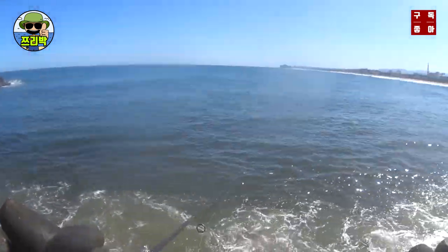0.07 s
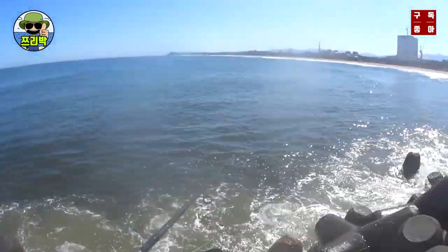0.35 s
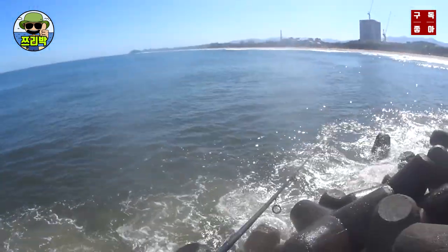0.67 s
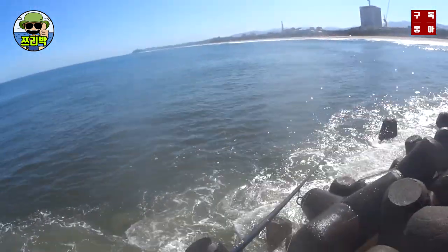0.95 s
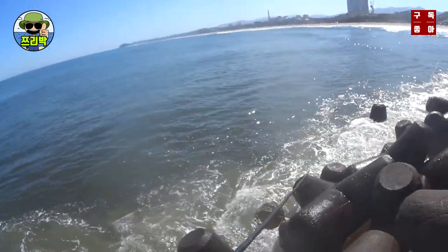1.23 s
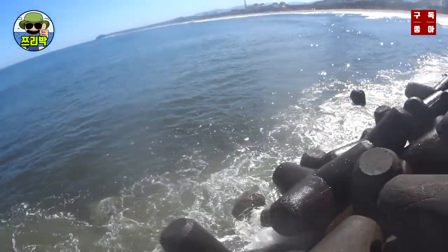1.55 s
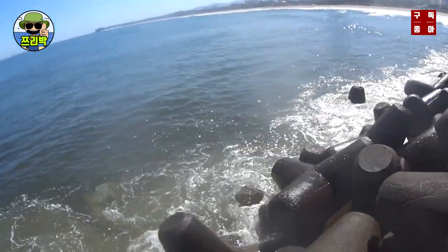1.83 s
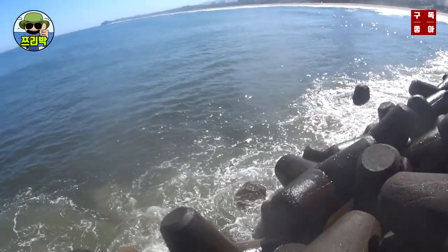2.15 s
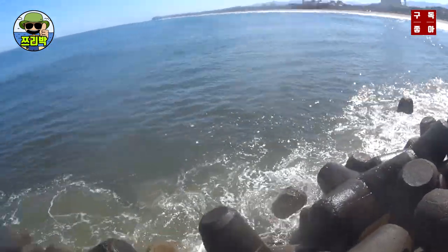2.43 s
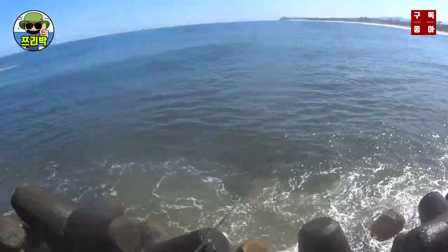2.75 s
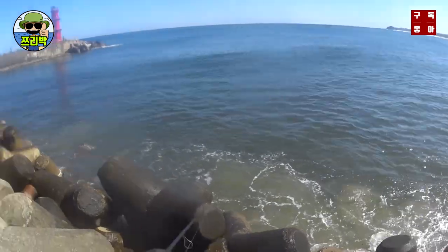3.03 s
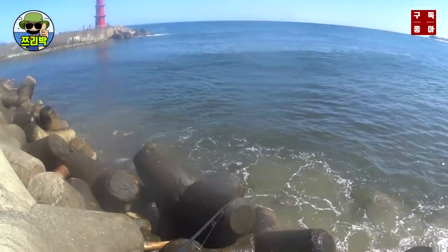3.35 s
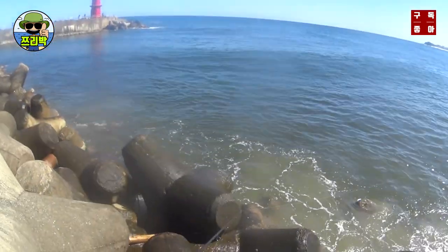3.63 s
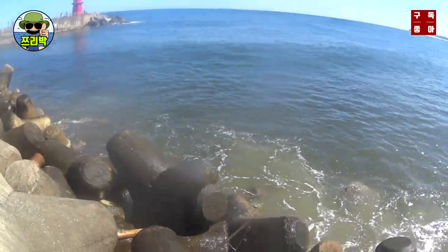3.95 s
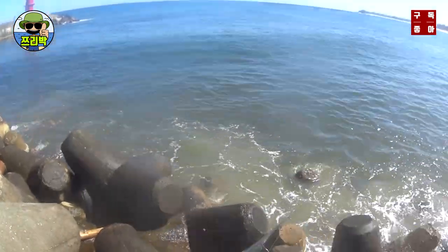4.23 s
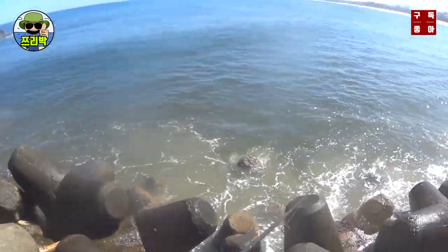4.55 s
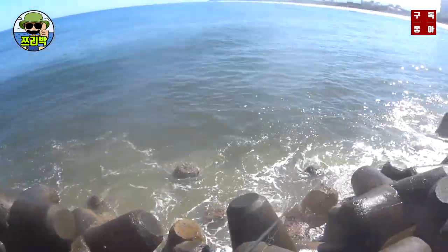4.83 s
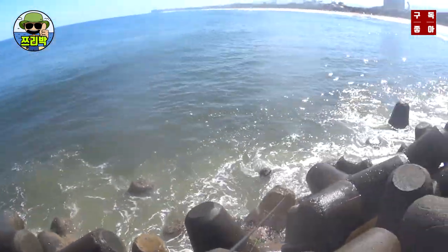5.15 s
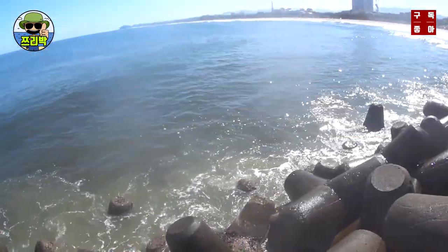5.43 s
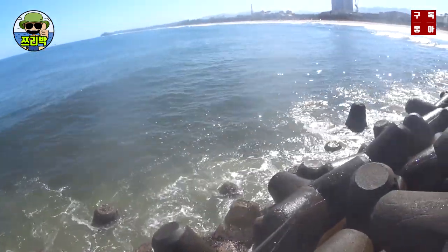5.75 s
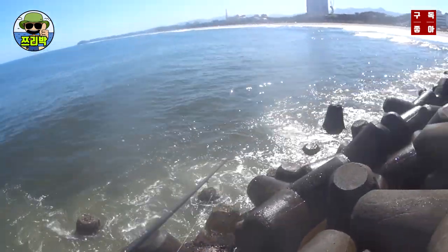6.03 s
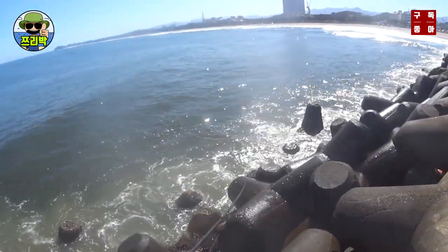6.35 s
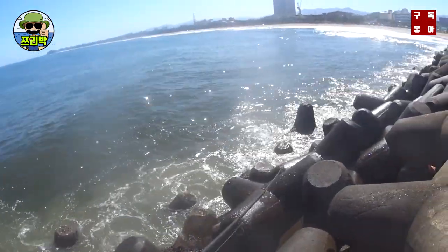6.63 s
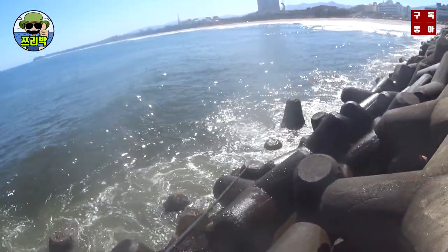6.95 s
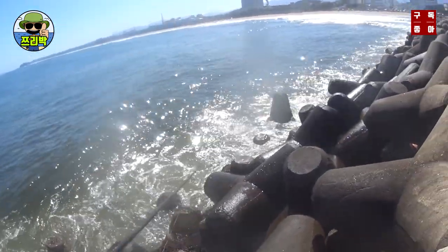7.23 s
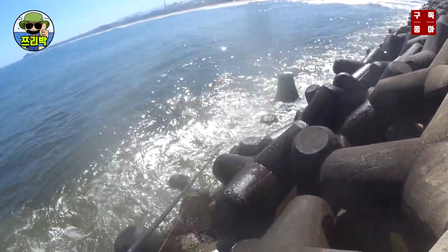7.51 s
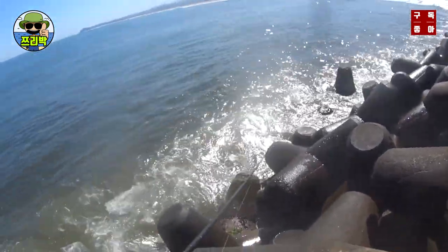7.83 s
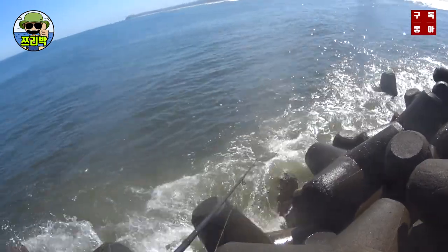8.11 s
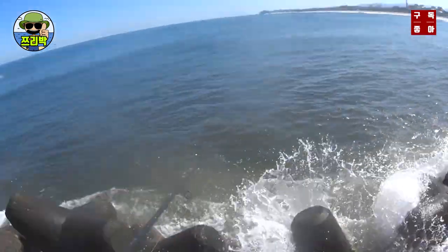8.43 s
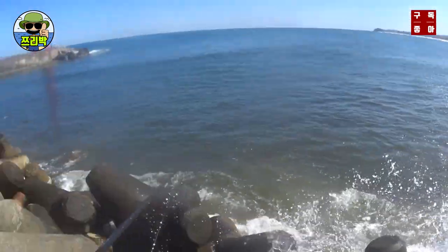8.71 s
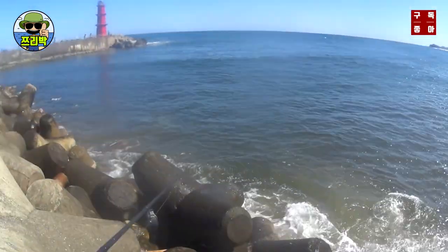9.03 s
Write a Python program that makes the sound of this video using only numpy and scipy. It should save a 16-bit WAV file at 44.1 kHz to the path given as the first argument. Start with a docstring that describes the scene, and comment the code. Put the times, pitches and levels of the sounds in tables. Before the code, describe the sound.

Sea water washes over the concrete blocks of a breakwater, heard from just above. A wave drains away with fizzing foam and a few hollow gulps in the gaps. In the quieter stretch, small splashes slap the concrete and drops tick nearby. Near the end a bigger wave builds and breaks with heavy thumps, a low roar and a bright hiss of falling spray.

```python
"""Swell on a breakwater

Sea washes over concrete blocks, heard from just above. One wave drains away, foam fizzes and
water gulps in the gaps, then a bigger wave breaks and throws spray.
Big bubble clouds make the low roar, small bubbles the wash, falling drops the hiss."""
import sys
import numpy as np
from scipy import signal
from scipy.fft import rfft, irfft
from scipy.io import wavfile

SR = 44100
rng = np.random.default_rng(int(sys.argv[2]) if len(sys.argv) > 2 else 0)


def unload_wav(signal):
    """Save mono or channel-first audio to the path in sys.argv[1] as 16-bit WAV at rate SR, clipped to [-1, 1]."""
    wavfile.write(
        sys.argv[1],
        SR,
        np.round(np.clip(np.atleast_2d(signal).T, -1, 1) * 32767).astype(np.int16),
    )


N = 404397
TIME_S = np.arange(N) / SR
FREQ_HZ = np.maximum(np.arange(N // 2 + 1) * SR / N, 1)

# sea working against the blocks: (time [s], whitewater level [dB])
SURGE_CURVE = [(0, -31.5), (.5, -35), (1.2, -33.5), (1.55, -36), (1.9, -37), (2.25, -39.5), (3.3, -43),
               (3.85, -42), (4.25, -39), (4.6, -41), (7.05, -43), (7.6, -36.5), (7.8, -30), (8.0, -29.5),
               (8.25, -24), (8.7, -24.5), (9.05, -25.5), (9.17, -28)]
# toppling crests: (start [s], lift of wash and spray [dB], rise [s])
BREAKER_LIFTS = [(1.63, 4, 0.079), (7.67, 3, 0.029), (8.035, 3.5, 0.022), (8.19, 1.8, 0.028)]
# surf colour: (frequency [Hz], gain [dB])
SURF_SPECTRUM = [(21, -73), (35, -45.5), (165, -19), (264, -9.5), (495, -1), (726, -5.5), (1110, -2.5),
                 (1420, -4.5), (2280, -4), (3120, -5.5), (5120, -2), (5860, -6.5), (7500, -18.5),
                 (9750, -19), (16500, -120)]
# fine mist colour: (frequency [Hz], gain [dB])
MIST_SPECTRUM = [(2940, -24), (5000, -27.5), (5760, -5), (9290, -17.5), (12200, -16), (14400, -23)]
# spray landing close by: (peak time [s], level [dB], Gaussian sigma [s], centre [Hz], width [Hz])
SPRAY_SHOWERS = [(.1, -63, .25, 12300, 2000), (1.03, -42.5, 0.16, 6800, 4500),
                 (1.034, -30.5, 0.034, 5560, 1500), (1.75, -54, 0.13, 12500, 2500),
                 (4.353, -49, 0.05, 11800, 2200), (4.34, -37.5, .035, 5160, 1600),
                 (4.45, -39, 0.05, 4930, 2000), (5.052, -52, .2, 5900, 4000),
                 (8.43, -26.5, 0.043, 5200, 2400), (8.71, -42, 0.47, 12300, 2037),
                 (8.957, -25.5, 0.14, 4960, 2600)]
# sheets of water hitting concrete: (start [s], peak [dB], twice the rise [s])
WATER_SLAPS = [(.147, -19, .0036), (3.061, -26, .006), (3.504, -28, .007), (3.586, -23.5, 0.011),
               (3.74, -25, .009), (3.835, -26, .003), (4.31, -26, 0.055), (4.665, -28, .003),
               (5.186, -23, 0.0077), (5.581, -26, 0.024), (6.984, -28, .006), (7.241, -27, .003),
               (7.67, -21, .015), (7.73, -21.5, 0.021)]
# air pockets closing between blocks: (start [s], relative peak [dB], pitch [Hz], twice the rise [s])
AIR_POCKETS = [(0.764, -33, 377, 0.032), (1.277, -28, 455, 0.02), (1.464, -30, 477, 0.026),
               (2.173, -34.5, 327, 0.022), (2.606, -35, 380, 0.025), (3.283, -34.5, 906, 0.026),
               (4.25, -28, 1185, 0.02), (4.383, -27, 538, 0.02), (5.047, -30.5, 530, 0.017)]
# heavy water striking the blocks: (start [s], level [dB], rise [s], centre [Hz], width [Hz])
WATER_THUMPS = [(.77, -39, 0.019, 403, 400), (1.25, -42, .04, 350, 400), (1.68, -37, 0.023, 477, 500),
                (7.738, -24, 0.015, 1050, 1280), (7.742, -30.5, .035, 434, 450),
                (8.035, -31.5, 0.027, 400, 400), (8.19, -46, 0.064, 177, 171), (8.22, -28, 0.12, 450, 450),
                (8.308, -22.5, 0.017, 990, 1300), (8.58, -30, 0.084, 497, 500),
                (9.11, -37.5, .023, 212, 199)]
# single drops landing close by: (start [s], peak [dB], pitch [Hz])
NEAR_DRIPS = [(3.132, -35, 8700), (4.095, -36, 12000), (4.128, -35, 12300), (4.161, -35, 12000),
              (4.571, -42, 10300), (4.647, -39, 12000), (4.670, -32, 8100), (7.719, -29, 8500)]
# incoming crest spilling: (time [s], level [dB])
CREST_CURVE = [(0, -93), (5.3, -55), (6.0, -53), (7.0, -50), (7.4, -45), (7.75, -43), (8.0, -38),
               (9.17, -69)]
# two microphone ports: (frequency [Hz], left lead [rad], left minus right [dB], stray share [dB])
MIC_PORTS = [(60, .05, -2, -16), (180, 0.34, -1.3, -24), (450, 0.4, -1, -26), (850, 0.53, 0.1, -23),
             (1600, 0.42, 1.2, -18), (3000, 0.12, 1.5, -16.5), (5500, -0.096, 1, -22.5),
             (9500, -.07, 0, -18.5), (11000, -0.42, 0.5, -9), (11800, .4, -2, -5), (13500, 0, 0.5, -16)]

CALM_DB = -40  # whitewater between waves
ROAR_DB, ROAR_DB_PER_DB = -45.5, 0.97  # in the calm; slope against surge
SPRAY_DB, SPRAY_DB_PER_DB = -40.5, 1.123  # in the calm; slope against surge
MIST_DB, MIST_DB_PER_DB = -14.5, 0.042  # relative to spray; slope against thrown spray
HEAVE_DB, HEAVE_HZ = 0.55, 4.2  # bubble clouds surface unevenly
SPRAY_FLIGHT_S = 0.059
CUTOFF_HZ = 14350


def from_db(db):
    """Decibels to gain."""
    return 10 ** (np.asarray(db) / 20)


def unit_rms(x):
    """Scale to unit power."""
    return x / np.sqrt(np.mean(x ** 2) + 1e-20)


def over_time(curve, delay_s=0):
    """A delayed curve at every sample."""
    times_s, values = np.transpose(curve)
    return np.interp(TIME_S - delay_s, times_s, values)


def over_frequency(rows):
    """Each column of a spectrum at every bin."""
    hz, *columns = np.transpose(rows)
    return [np.interp(np.log(FREQ_HZ), np.log(hz), column) for column in columns]


def band(x, spectrum, low_hz, high_hz):
    """Colour and band-limit with soft edges; unit RMS."""
    colour = from_db(over_frequency(spectrum)[0])
    edge_loss = (1 + (low_hz / FREQ_HZ) ** 12) * (1 + (FREQ_HZ / high_hz) ** 12)
    return unit_rms(irfft(rfft(x) * colour / np.sqrt(edge_loss), N))


def drift(rate_hz):
    """Smooth random wander; unit RMS."""
    return unit_rms(irfft(rfft(rng.standard_normal(N)) / (1 + (FREQ_HZ / rate_hz) ** 2), N))


def resonate(x, hz, width_hz):
    """Two-pole resonance, unity peak gain."""
    radius = np.exp(-np.pi * width_hz / SR)
    feedback = [1, -2 * radius * np.cos(2 * np.pi * hz / SR), radius ** 2]
    return signal.lfilter(np.array([1, 0, -1]) * (1 - radius ** 2) / 2, feedback, x + 1e-18)


def resonate_twice(x, hz, width_hz):
    """Two equal resonances in series; unit RMS."""
    return unit_rms(resonate(resonate(x, hz, width_hz), hz, width_hz))


def burst(start_s, rise_s):
    """Envelope: rises to 1, then decays."""
    age = np.maximum(TIME_S - start_s, 0) / rise_s
    return age * np.exp(1 - age)


def impacts(per_s, spread_db):
    """Random clicks: many small, a few large."""
    sizes = from_db(spread_db * np.minimum(rng.exponential(1, N), 6))
    return sizes * rng.choice([-1, 1], N) * (rng.random(N) < per_s / SR)


def bubbles(per_s, spread_db, low_hz, high_hz, q, clump_db, sizes=16):
    """Bubbles ring briefly at birth; each size comes in its own clumps."""
    births, size = impacts(per_s, spread_db), rng.integers(0, sizes, N)
    out = 0
    for k, hz in enumerate(np.geomspace(low_hz, high_hz, sizes)):
        ringing = resonate(births * (size == k), hz, hz / q)
        out += ringing * from_db(clump_db * drift(rate_hz=6.2))
    return unit_rms(out)


def surge_db(delay_s=0):
    """Sea strength relative to the calm."""
    return over_time(SURGE_CURVE, delay_s) - CALM_DB


def breaker_db():
    """Brief lift from each toppling crest."""
    return sum(db * burst(start_s, rise_s) for start_s, db, rise_s in BREAKER_LIFTS)


def roar():
    """Air clouds throb under the foam, over the blur of distant surf."""
    clouds = bubbles(per_s=900, spread_db=1.5, low_hz=130, high_hz=826, q=7.9, clump_db=1.5)
    water = from_db(-2.5) * clouds + from_db(12.5) * rng.standard_normal(N)
    level_db = ROAR_DB + ROAR_DB_PER_DB * surge_db() + HEAVE_DB * drift(HEAVE_HZ)
    return from_db(level_db) * band(water, SURF_SPECTRUM, 25, 766)


def wash(churn_db):
    """Whitewater: thousands of small bubbles a second, swelling with the churn."""
    near = bubbles(per_s=5000, spread_db=2, low_hz=590, high_hz=3895, q=7.5, clump_db=0.56)
    water = near + from_db(7) * rng.standard_normal(N)
    level_db = CALM_DB + surge_db() + breaker_db() + churn_db
    return from_db(level_db) * band(water, SURF_SPECTRUM, 660, 3260)


def spray(churn_db):
    """Drops patter on water and concrete; more thrown gives a denser, smoother hiss."""
    thrown_db = SPRAY_DB_PER_DB * surge_db(SPRAY_FLIGHT_S) + breaker_db()
    per_s = 5200 * from_db(0.7 * thrown_db)
    drops = unit_rms(impacts(per_s, spread_db=2) / np.sqrt(per_s))
    foam = drops + from_db(-0.5) * rng.standard_normal(N)
    foam *= from_db(churn_db + 0.68 * drift(rate_hz=30))
    pops = unit_rms(impacts(per_s / 4, spread_db=0.5) / np.sqrt(per_s))
    mist = from_db(MIST_DB + MIST_DB_PER_DB * thrown_db) * band(foam + pops, MIST_SPECTRUM, 6570, 17500)
    return from_db(SPRAY_DB + thrown_db) * (band(foam, SURF_SPECTRUM, 3430, 7080) + mist)


def rumble():
    """Faint, deep open sea; independent at each port."""
    ports = [resonate_twice(rng.standard_normal(N), hz=89, width_hz=70) for _ in range(2)]
    return from_db(-79.5) * np.array(ports)


def showers():
    """Fine spray lands in a soft, bright swish."""
    drops = impacts(per_s=12000, spread_db=4)
    out = 0
    for peak_s, db, sigma_s, hz, width_hz in SPRAY_SHOWERS:
        swell = np.exp(-0.5 * ((TIME_S - peak_s) / sigma_s) ** 2)
        out += from_db(db) * swell * resonate_twice(drops, hz, width_hz)
    return out


def slaps():
    """A sheet of water lands as a tight cluster of drop impacts."""
    envelope = sum(from_db(db) * burst(start_s, span_s / 2) for start_s, db, span_s in WATER_SLAPS)
    drops = resonate(impacts(per_s=9000, spread_db=2.5), hz=4600, width_hz=2600)
    patter = band(drops, SURF_SPECTRUM, 1250, 9000)
    return envelope * patter / np.percentile(np.abs(patter), 99.5)


def gulps():
    """Trapped air rings hollow and unsteady, rising in pitch as it nears the surface."""
    waver = 0.08 * drift(rate_hz=76)
    out = 0
    for start_s, db, hz, span_s in AIR_POCKETS:
        glide = 0.47 * np.clip(TIME_S - start_s, 0, 0.1)
        phase_rad = 2 * np.pi * np.cumsum(hz * (1 + waver + glide)) / SR
        out += from_db(db - 7) * burst(start_s, span_s / 2) * np.sin(phase_rad)
    return out


def thumps():
    """Heavy water hits concrete and drives a hollow rush of air through the gaps."""
    rush = impacts(per_s=6000, spread_db=1)
    return sum(from_db(db) * burst(start_s, rise_s) * resonate_twice(rush, hz, width_hz)
               for start_s, db, rise_s, hz, width_hz in WATER_THUMPS)


def drips(decay_s=0.00044):
    """A lone drop gives one tiny, bright tick."""
    out = 0
    for start_s, db, hz in NEAR_DRIPS:
        age_s = np.maximum(TIME_S - start_s, 0)
        out += from_db(db) * np.exp(-age_s / decay_s) * np.sin(2 * np.pi * hz * age_s)
    return out


def crest():
    """A spilling crest gargles in one range of bubble sizes."""
    spill = bubbles(per_s=2500, spread_db=0, low_hz=990, high_hz=1456, q=14, clump_db=4.5, sizes=6)
    return from_db(over_time(CREST_CURVE)) * unit_rms(resonate(spill, hz=1050, width_hz=900))


def block_scatter(t60_s):
    """Dense echoes off the jumbled blocks, as an all-pass frequency response."""
    echoes = rfft(rng.standard_normal(N) * from_db(-60 * TIME_S / t60_s))
    return echoes / np.abs(echoes)


def scene():
    """Surf reaches both ports almost alike; scattered sound sets them apart."""
    churn_db = 0.5 * drift(rate_hz=22)
    sea = roar() + wash(churn_db) + crest() + spray(churn_db)
    sea += thumps() + gulps() + slaps() + drips() + showers()
    lead_rad, balance_db, stray_db = over_frequency(MIC_PORTS)
    sides = np.array([[1], [-1]])  # left, right
    stray = sides * from_db(stray_db) * block_scatter(t60_s=0.4)
    port_response = from_db(sides * balance_db / 2) * np.exp(0.5j * sides * lead_rad)
    return irfft(rfft(sea) * (1 + stray) * port_response, N) + rumble()


def record(dry):
    """Steep elliptic low-pass."""
    return signal.sosfilt(signal.ellip(12, 0.1, 90, CUTOFF_HZ, fs=SR, output="sos"), dry)


dry = scene()
out = record(dry)
unload_wav(out)
```